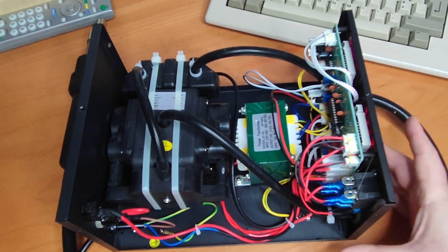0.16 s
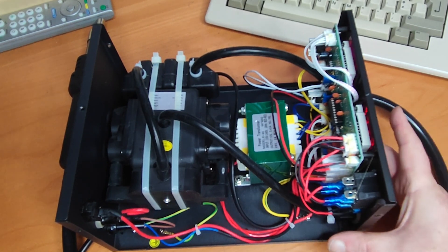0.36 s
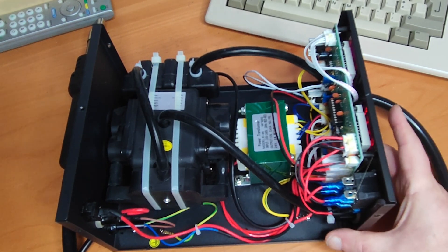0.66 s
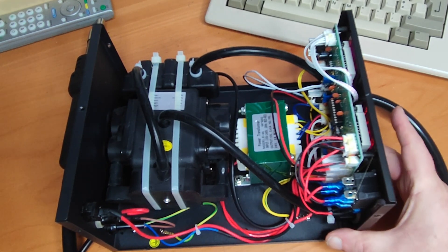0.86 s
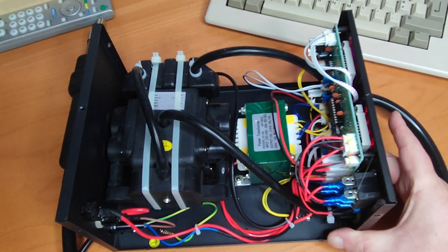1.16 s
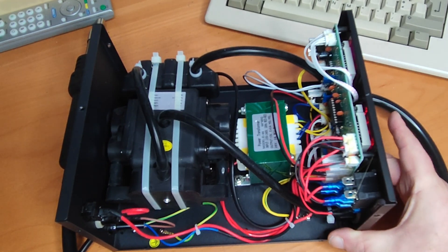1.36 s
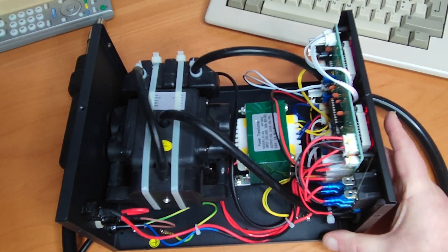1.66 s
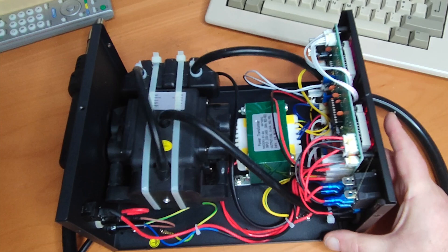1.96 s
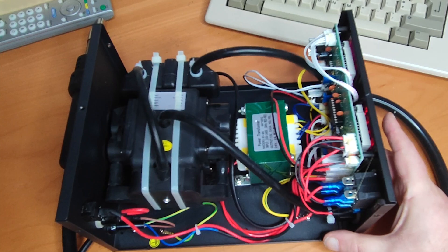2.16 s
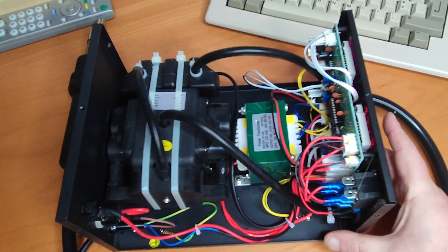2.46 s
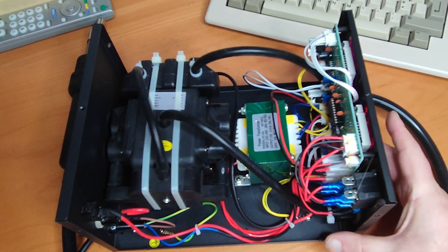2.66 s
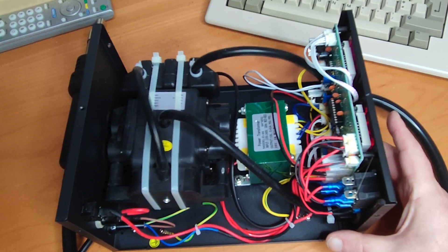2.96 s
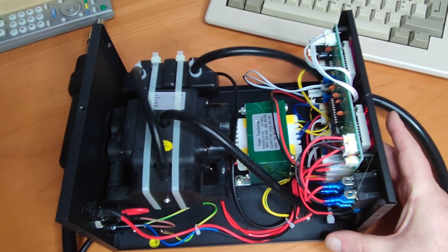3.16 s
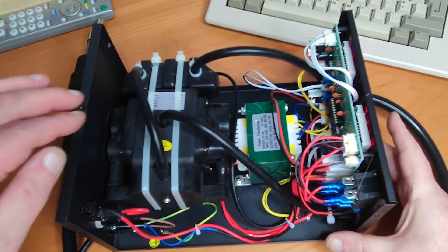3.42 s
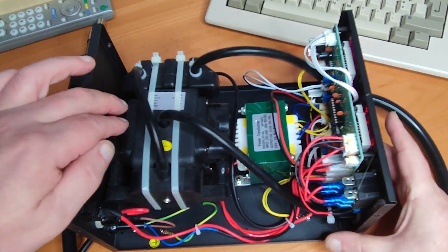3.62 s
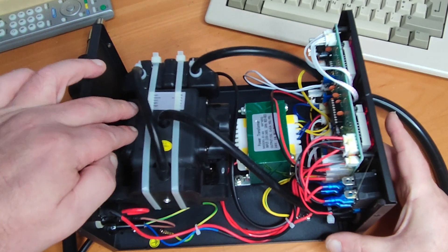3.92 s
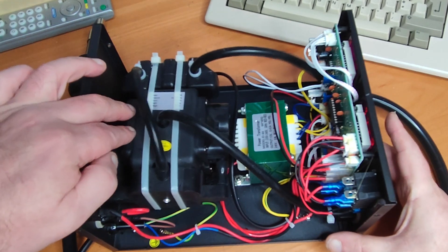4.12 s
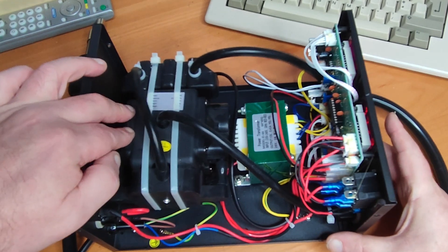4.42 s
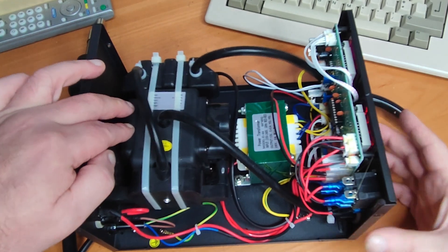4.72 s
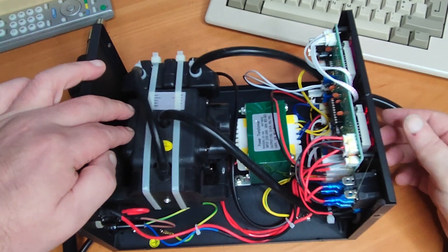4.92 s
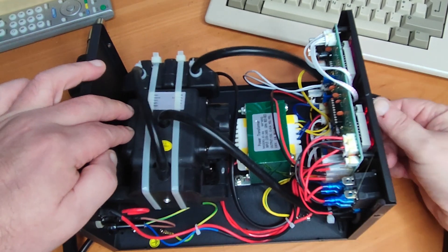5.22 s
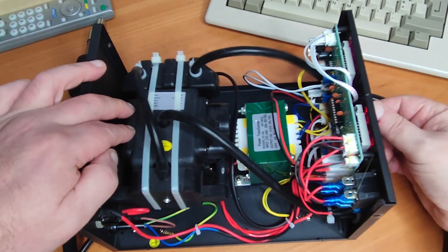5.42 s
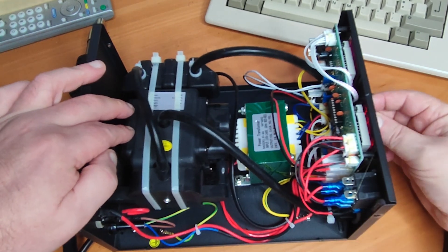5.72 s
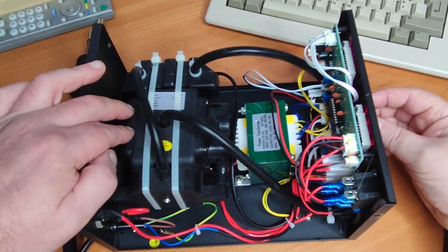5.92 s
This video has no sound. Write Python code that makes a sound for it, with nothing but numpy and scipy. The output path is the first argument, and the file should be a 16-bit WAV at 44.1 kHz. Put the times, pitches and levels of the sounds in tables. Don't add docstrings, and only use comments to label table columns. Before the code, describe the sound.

A switch snaps, a relay clicks, and a buzzing diaphragm pump roars close by, then drops to a quieter hum with whistling leaks.

```python
import sys
import numpy as np
from scipy import signal
from scipy.fft import irfft
from scipy.io import wavfile
from scipy.ndimage import uniform_filter1d

SR = 44100
rng = np.random.default_rng(int(sys.argv[2]) if len(sys.argv) > 2 else 0)


def generate_wav(sig):
    pcm = np.round(np.clip(np.atleast_2d(sig).T, -1, 1) * 32767).astype(np.int16)
    wavfile.write(sys.argv[1], SR, pcm)


def voltage_ratio(decibels):
    exponent = np.asarray(decibels, float) / 20
    return 10 ** exponent


N = 268304
T = np.arange(N) / SR
MAINS_HZ = 50.02


def evened(x):
    return x / np.sqrt(np.mean(x ** 2) + 1e-20)


def read(points, hz):
    f, value = np.transpose(points)
    return np.interp(np.log(hz + 1), np.log(f + 1), value)


def unit(spectrum, hz):
    inside = (hz >= spectrum[0][0]) * (hz <= spectrum[-1][0])
    return evened(voltage_ratio(read(spectrum, hz)) * inside)


def lift(modes, hz):
    return sum((db / (1 + (2 * (hz - f) / width) ** 2) for f, width, db in modes), 0 * hz)


def bump(t, s, length):
    return np.exp(-(2 * (t - s) / length) ** 2)


def drift(size):
    once = uniform_filter1d(rng.standard_normal(N), size=size)
    return evened(uniform_filter1d(once, size=size))


def add(mix, s, sound):
    part = mix[round(s * SR):][:len(sound)]
    part += sound[:len(part)]


def resonate(x, hz, width):
    turn = np.exp(2j * np.pi * np.cumsum(hz * np.ones(len(x))) / SR)
    r = np.exp(-np.pi * width / SR)
    return 2 * (turn * signal.lfilter([1 - r], [1, -r], x / turn)).real


def ring(modes):
    out, t = np.zeros(N), np.arange(SR // 2) / SR
    for s, hz, db, rise, t60 in modes:
        swell = np.sin(np.pi / 2 * np.minimum(t / rise, 1))
        decay = voltage_ratio(db - 60 * np.maximum(t - rise, 0) / t60)
        add(out, max(s, 0), swell * decay * np.sin(2 * np.pi * hz * t))
    return out


def banded(x):
    low_pass = signal.firwin(2047, 15750, window=("kaiser", 9), fs=SR)
    return signal.oaconvolve(x, low_pass, "same")


# time in seconds, grip from 0 to 1.
HELD = [
    (0, 0),
    (2.9, 0),
    (3.3, .5),
    (4.1, .7),
    (4.6, 1),
    (6.1, 1),
]


def noise(spectrum, patchy_db, modes=(), held=None, held_modes=None, lead=0):
    hz, frames = np.fft.rfftfreq(1024, 1 / SR), N // 256 + 5
    a, b, patches = rng.standard_normal((frames, 513, 3)).T
    patches = uniform_filter1d(patches, size=6, axis=0)
    patches = uniform_filter1d(patches, size=30, axis=1)
    patches = evened(np.tanh(evened(patches)))
    grip = np.interp(np.arange(frames) * 256 / SR + lead, *np.transpose(HELD))
    colour = (1 - grip) * unit(spectrum, hz)[:, None] + grip * unit(held or spectrum, hz)[:, None]
    lift_db = (1 - grip) * lift(modes, hz)[:, None] + grip * lift(held_modes or modes, hz)[:, None]
    patch_db = patchy_db * patches * (.45 + .55 * grip)
    z = (a + 1j * b) * colour * voltage_ratio(lift_db + patch_db)
    return evened(signal.istft(z, nperseg=1024, noverlap=768)[1][:N])


# pitch in Hz, level in dB per Hz.
FLOOR = [(18, -51), (30, -6), (62, -17), (95, -9), (221, -7.5), (251, -3.5), (448, -8.5), (910, -15),
         (984, -14.5), (2670, -20), (4750, -21.5), (5140, -21.5), (15900, -23)]
# pitch in Hz, width in Hz, lift in dB.
DESK = [(112, 49, 12.5)]


def room_rumble():
    return voltage_ratio(-63.5) * noise(FLOOR, 3.0, DESK)


# pitch in Hz, level in dB per Hz.
FADING = [(88, -23), (150, 0), (244, -12), (788, -10.5), (1390, -44), (1750, -23), (2350, -21), (3090, -28),
          (4140, -20.5), (7010, -39), (14400, -9.5), (15900, -18)]


def fading_puff():
    t60 = 0.25
    return voltage_ratio(-41.5 - 60 * T / t60) * noise(FADING, 3.4)


# start in seconds, desk top in dB, case in dB, rise in s, 60 dB decay in s.
PUSHES = [
    (0, -40, -46.5, 0.0031, 0.087),
    (.085, -75, -65, .025, 0.16),
    (.221, -70, -48, 0.0047, 0.15),
    (0.238, -56, -61, 0.023, 0.25),
    (1.15, -56, -75, 0.023, 0.39),
    (1.298, -30.5, -60, 0.035, 0.26),
]
# pitch in Hz, level in dB.
DESK_MODES = [(113, 2.5), (195, -7)]
CASE_MODES = [(255, 2), (320, 2.5), (385, -8), (490, -10), (590, -14), (765, -13)]
# start in seconds, pitch in Hz, level in dB, rise in s, 60 dB decay in s.
FIRST_KNOCK = [
    (0, 780, -50, .002, 0.11),
    (0, 593, -50, .002, 0.17),
]
# start in seconds, pitch in Hz, level in dB, rise in s, 60 dB decay in s.
JOLT = (1.5825, 108, -20.5, .052, .16)


def knocks():
    rings = []
    for s, desk_db, case_db, rise, t60 in PUSHES:
        for db, modes in ((desk_db, DESK_MODES), (case_db, CASE_MODES)):
            for hz, mode_db in modes:
                shorter = min(300 / hz, 1) ** .5
                rings.append((s, hz, db + mode_db, rise, t60 * shorter))
    return ring(rings + FIRST_KNOCK + [JOLT])


# time in seconds, pitch in Hz, level in dB.
CREAK = [
    (.221, 290, -62),
    (.226, 285, -50),
    (.25, 336, -47.5),
    (.283, 255, -52),
    (.295, 240, -59),
    (.33, 235, -72),
]


def creak():
    s, hz, db = np.transpose(CREAK)
    turn = 2 * np.pi * np.cumsum(np.interp(T, s, hz)) / SR
    on = (T > s[0]) * (T < s[-1])
    judder = 1 + 0.27 * np.cos(2 * np.pi * 70 * T)
    return on * voltage_ratio(np.interp(T, s, db)) * np.sqrt(2) * np.sin(turn) * judder


# pitch in Hz, 60 dB decay in seconds.
ROOM = [(400, 0.53), (1100, 0.27), (2800, 0.42), (3600, 0.27), (4500, 0.23), (8500, 0.24), (11000, 0.17),
        (15000, 0.17)]


def room_tail():
    hz, t, z = signal.stft(rng.standard_normal(SR // 2), SR, nperseg=256)
    tail = signal.istft(z * voltage_ratio(-60 * t / read(ROOM, hz)[:, None]), SR, nperseg=256)[1]
    return tail / np.linalg.norm(tail)


def snaps(events, spectrum, rings):
    crack, direct, send = noise(spectrum, 0.67, rings), np.zeros(N), np.zeros(N)
    t = np.arange(SR // 5) / SR
    for s, db, rise, t60, room_db in events:
        shape = np.minimum(t / rise, 1) ** 2 * voltage_ratio(db - 60 * np.maximum(t - rise, 0) / t60)
        burst = shape * crack[round(s * SR):][:len(t)]
        add(direct, s, burst)
        add(send, s + rise, np.array([voltage_ratio(room_db) * np.linalg.norm(burst)]))
    hz = np.fft.rfftfreq(512, 1 / SR)
    colour = np.fft.fftshift(irfft(unit(spectrum, hz) * voltage_ratio(lift(rings, hz))))
    send = signal.oaconvolve(send, colour / np.linalg.norm(colour), "same")
    return direct + voltage_ratio(8.5) * banded(signal.oaconvolve(send, room_tail())[:N])


# start in seconds, level in dB, rise in s, 60 dB decay in s, room in dB.
SWITCH = [
    (1.2902, -11.5, .0045, 0.022, -6.5),
    (1.3065, -26.5, .003, 0.046, -14.5),
]
# pitch in Hz, level in dB per Hz.
SNAP = [(180, -64), (300, -34), (488, -32), (680, -44), (850, -27), (1150, -18.5), (1850, -24.5),
        (2840, -25), (3500, -13.5), (4460, -7.5), (5280, -12), (11000, -5), (14400, -5), (15700, -12),
        (15900, -26), (16500, -32.5)]
# pitch in Hz, width in Hz, lift in dB.
SWITCH_RINGS = [(1070, 430, 8), (1470, 130, 9), (2240, 200, 9), (4520, 250, 8), (5700, 900, 4),
                (8100, 480, 5.5), (14750, 500, 3)]
# start in seconds, pitch in Hz, level in dB, rise in s, 60 dB decay in s.
ROCKER = [(1.2925, 4465, -25.5, .002, .19), (1.293, 4576, -34, .002, .27), (1.293, 4400, -32, .002, .12),
          (1.294, 6080, -29, .002, .12), (1.294, 5615, -33, .002, .18), (1.296, 3908, -37, .003, .18),
          (1.30, 3585, -41, .006, .25), (1.296, 1308, -42, .004, .19), (1.294, 6928, -36, .002, .17),
          (1.294, 7790, -35, .002, .2), (1.294, 1120, -33, .006, .12), (1.295, 880, -41, .006, .12),
          (1.297, 2130, -40, .008, .15), (1.297, 2240, -39, .006, .12), (1.296, 1580, -35, .003, .1),
          (1.298, 480, -47, .02, .13), (1.315, 420, -52, .02, .15), (1.37, 55, -50, .02, .25)]


def switch():
    gate = np.clip((1.47 - T) / 0.058, 0, 1)
    return gate * (snaps(SWITCH, SNAP, SWITCH_RINGS) + ring(ROCKER))


# start in seconds, level in dB, rise in s, 60 dB decay in s, room in dB.
RELAY = [
    (1.5605, -15.5, .0045, 0.016, -20),
    (1.5668, -19, .0015, 0.022, -3.5),
    (1.5725, -35, .001, .04, -14),
]
# pitch in Hz, level in dB per Hz.
RELAY_SNAP = [(290, -58), (500, -26), (2540, -36), (4110, -18), (4690, -31), (5590, -9.5), (6760, -18),
              (13600, 0.5), (16500, -21)]
# pitch in Hz, width in Hz, lift in dB.
RELAY_RINGS = [(4120, 270, 11), (5650, 200, 17), (9500, 350, 16.5), (11500, 400, 8), (13600, 450, 4)]


def relay():
    return snaps(RELAY, RELAY_SNAP, RELAY_RINGS)


# start in seconds, pitch in Hz, level in dB, rise in s, 60 dB decay in s.
ARMATURE = [
    (1.5635, 9550, -22, .0015, .025),
    (1.563, 5680, -24, .002, .035),
    (1.5665, 13800, -21, .0015, .025),
    (1.564, 15300, -26, .0015, .02),
    (1.565, 900, -46, .003, .08),
    (1.567, 700, -49, .006, .15),
]


def armature():
    return ring(ARMATURE)


def stroke(depth_db, uneven=0.22):
    turn = 2 * np.pi * MAINS_HZ * T
    return voltage_ratio(depth_db * (np.cos(2 * turn - 1.9) + uneven * np.cos(turn - .3)))


def whistles(breeze, rows, glide, width_share):
    out = np.zeros(N)
    for s, length, middle_hz, db in rows:
        first, count = round((s - length / 2) * SR), round(length * SR)
        wind = breeze[first:first + count]
        hz = middle_hz * (1 + glide * np.linspace(-.5, .5, num=len(wind)))
        width = 1.83 * width_share * np.sqrt(middle_hz * 10000)
        whistle = evened(resonate(resonate(wind, hz, width), hz, width))
        add(out, first / SR, voltage_ratio(db) * whistle * np.hanning(count)[:len(wind)] ** 0.83)
    return out


# middle in seconds, length in s, pitch in Hz, level in dB.
STIRS = [
    (.18, .3, 14900, -66),
    (.375, 0.18, 14850, -63),
    (1.17, .09, 4420, -75),
    (3.7, 0.37, 14750, -48),
]
BROAD = [(3.25, 1.7, 12400, -40.5), (3.52, 0.8, 11330, -50), (3.24, 0.2, 4630, -51),
         (3.1, 0.43, 2730, -54.5), (3.85, 1.5, 14200, -43), (4.673, 0.066, 12650, -45),
         (5.7, .1, 13300, -40), (4.982, 0.19, 13800, -25), (5.58, 0.38, 9000, -47), (5.29, 0.6, 9430, -46),
         (5.3, 0.52, 9130, -48), (5.44, 1.1, 7320, -53), (5.58, .5, 12800, -49)]
PINCHED = [(3.058, 0.087, 1330, -41), (3.09, .12, 4700, -48), (3.38, 0.81, 2425, -55.5),
           (3.13, 0.33, 2800, -56), (3.05, 0.34, 2380, -51), (3.51, 0.2, 3525, -51), (4.2, 0.73, 3520, -54),
           (4.198, 0.14, 1360, -47.5), (4.425, 0.19, 2470, -51.5), (4.9, 0.16, 3520, -54),
           (5.53, 0.24, 2520, -51), (5.37, .16, 2520, -56), (5.17, .15, 2520, -58), (5.82, .2, 2520, -58),
           (4.3, 0.43, 2250, -59), (3.3, .12, 4500, -51), (3.22, .1, 5200, -51), (3.05, .1, 5250, -47),
           (5.65, .25, 1080, -57), (4.1, 0.33, 1150, -56), (4.25, .2, 960, -54), (3.66, .1, 325, -55),
           (3.9, .2, 335, -62), (5.7, .2, 340, -65)]
TWISTED = [
    (4.72, .12, 8360, -43),
    (4.766, .15, 13400, -33),
    (4.9, 0.28, 8950, -50),
    (5.05, .2, 14350, -38),
    (4.798, .065, 5980, -40),
    (4.91, 0.17, 6000, -40),
    (5.08, .3, 6050, -51),
    (5.3, 0.5, 4950, -54),
]
SLITS = [(1.7, .26, 13850, -35), (2.08, 1.0, 13800, -34), (2.0, .85, 14250, -37), (2.75, .7, 14500, -37),
         (2.75, .5, 12750, -38), (2.5, .25, 12250, -41), (2.8, .7, 11550, -42), (2.2, .7, 11550, -42),
         (2.3, .9, 10100, -43), (3.3, .6, 14700, -46), (5.95, .4, 9250, -60), (3.28, .45, 12950, -39.5),
         (3.15, .8, 12700, -43), (3.2, .6, 12250, -48), (3.2, .6, 11450, -46), (3.6, .3, 12200, -52),
         (3.52, .5, 11450, -45), (3.9, .5, 11350, -49), (3.6, .25, 13000, -50), (3.8, .7, 14400, -49),
         (4.1, 1.0, 13500, -43), (4.1, 1.2, 13750, -42), (4.15, .8, 13000, -53), (3.7, .6, 10060, -55),
         (4.98, .24, 13200, -37), (5.0, .2, 15200, -44), (5.5, .25, 12900, -48), (5.72, .2, 12850, -52),
         (5.3, .6, 12200, -52), (5.6, .6, 14400, -52), (5.95, .3, 13700, -53), (3.55, .3, 13650, -48),
         (5.9, .5, 5750, -59), (4.82, .14, 5100, -51), (5.3, .4, 4980, -51), (5.65, .4, 4900, -56),
         (4.93, .16, 3200, -56)]
SWEPT = [
    (5.14, .22, 14750, -37),
    (4.68, .12, 12750, -44),
    (4.97, .16, 6350, -47),
]


def leaks():
    breeze = rng.standard_normal(N) * stroke(depth_db=0.8)
    unsteady = evened(uniform_filter1d(rng.standard_normal(N), size=900))
    breeze *= voltage_ratio(0.71 * unsteady)
    out = whistles(breeze, STIRS, glide=-.015, width_share=.07)
    out += whistles(breeze, BROAD, glide=-.012, width_share=.039)
    out += whistles(breeze, PINCHED, glide=-.005, width_share=.014)
    out += whistles(breeze, TWISTED, glide=.045, width_share=.039)
    out += whistles(breeze, SLITS, glide=-.012, width_share=.02)
    return out + whistles(breeze, SWEPT, glide=.07, width_share=.022)


# time in seconds, drive in dB,
# air flow in dB (0 is free, lower is throttled by the hands).
PUMP = [(1.6, -39.5, -0.5), (1.81, -38.5, 0), (2.59, -38, -1), (2.82, -40, -1), (3.17, -51.5, -3),
        (3.3, -54.5, -3), (3.53, -54.5, -2), (3.69, -54, -3), (4.14, -54, -3), (4.48, -54, -2),
        (5.31, -52.5, -6), (5.67, -52.5, -6.5), (6.08, -54, -11)]


def level(offset_db, flow_share, start):
    s, drive_db, flow_db = np.transpose(PUMP)
    gain = voltage_ratio(np.interp(T, s, drive_db + offset_db + flow_share * flow_db))
    return gain * np.clip((T - start) / .02, 0, 1)


def reed():
    hz, width = 4600, 220 * 1.4
    puffs = rng.standard_normal(N) * stroke(depth_db=7.5, uneven=.3) * voltage_ratio(1.0 * drift(size=900))
    chatter = resonate(resonate(puffs, hz, width), hz, width)
    return voltage_ratio(4.0) * evened(chatter) * level(-3.0, 0.67, start=1.575)


# pitch in Hz, width in Hz, lift in dB.
CAVITIES = [(1295, 90, 11.5), (2040, 140, 4), (2710, 150, 7), (3410, 110, 4), (3998, 115, 10),
            (5220, 100, 8.5), (5930, 90, 5), (8900, 300, 1.5), (10200, 250, 4.5), (11550, 180, 5)]
CAVITIES_HELD = [(1310, 140, 6.6), (2060, 130, 3), (3470, 100, 4.3), (4030, 120, 3), (5250, 100, 2.8),
                 (5780, 170, 5.1), (10740, 200, 3), (12100, 180, 3.6), (14400, 280, 1)]
# pitch in Hz, level in dB per Hz.
JET = [(4000, -16.5), (6800, -22), (7380, -11.5), (9040, -3.5), (10300, -7), (10800, -7), (12200, -4.5),
       (13900, 1.5), (14800, 0), (15900, -14)]
JET_HELD = [(4000, -43), (6800, -24.5), (8100, -12.5), (9060, -19), (9820, -12), (12300, -10.5),
            (13300, -6.5), (13800, -5), (14600, -4), (15700, -11)]


def jet():
    hiss = noise(JET, 1.3, CAVITIES, JET_HELD, CAVITIES_HELD, lead=.4)
    return voltage_ratio(10.0) * hiss * stroke(depth_db=0.7) * level(4.28, 0.85, start=1.563)


# pitch in Hz, level in dB per Hz.
RUSH = [(1650, -12), (2800, -10), (3400, -3), (3750, -9.5), (3980, -4), (4570, -2), (4910, -2), (7200, -7),
        (9360, -40), (15800, -120)]
RUSH_HELD = [(1650, -12), (2800, -15.5), (3200, -8), (3470, -4), (3770, -8), (4530, -3), (4930, -6),
             (7200, -9), (9360, -49), (15800, -120)]


def rush():
    hiss = noise(RUSH, 2.6, CAVITIES, RUSH_HELD, CAVITIES_HELD)
    return voltage_ratio(-0.2) * hiss * stroke(depth_db=1.5) * level(7.73, 0.76, start=1.563)


# pitch in Hz, level in dB per Hz.
FLUTTER = [(62, -34), (85, -14), (120, -8), (240, -21), (340, -12.5), (470, -17), (700, -8.5), (900, -9.5),
           (1100, -2.5), (1400, -6.5), (1480, -9.5), (1850, -12), (2300, -17), (3200, -15), (4200, -47)]
FLUTTER_HELD = [(62, -40), (85, -17), (100, -17), (250, -19), (500, -12.5), (760, -11), (1050, -4),
                (1400, -8.5), (1480, -7.5), (1850, -18), (2300, -10), (3200, -14.5), (4200, -53)]


def flutter():
    rumble = noise(FLUTTER, 2.1, CAVITIES, FLUTTER_HELD, CAVITIES_HELD)
    surge = voltage_ratio(4 * bump(T, s=1.662, length=0.17))
    return voltage_ratio(-1.4) * rumble * stroke(depth_db=-1.0) * level(6.54, 1, start=1.577) * surge


# middle in seconds, length in s, multiple of mains, level in dB.
PANELS = [
    (4.24, 0.17, 14, -55),
    (4.42, 0.16, 14, -56),
    (4.32, 0.57, 14, -50),
    (4.24, 0.17, 19, -51.5),
    (5.85, 0.82, 21, -65),
    (5.85, 0.48, 45, -68),
]


def panels():
    out = np.zeros(N)
    for s, length, k, db in PANELS:
        t = np.arange(0, length, 1 / SR)
        tone = np.sin(2 * np.pi * k * MAINS_HZ * (t + s - length / 2)) * np.sqrt(2)
        add(out, s - length / 2, voltage_ratio(db) * tone * signal.windows.tukey(len(t), .7))
    return out * voltage_ratio(2.0 * drift(size=700))


# middle in seconds, length in s, multiple of mains,
# change in dB.
FALTERS = [(1.58, .1, 7, -10), (1.58, .1, 8, -8), (1.62, .13, 2, -14), (1.64, .14, 4, 6), (3.9, .7, 6, 3),
           (3.0, .7, 4, -3), (2.43, .05, 2, -4), (3.1, .7, 46, 6), (3.75, .4, 30, 7), (3.8, .5, 7, 4),
           (4.0, 1.6, 36, 7), (5.585, .07, 2, -16), (5.72, .2, 2, -6)]
# multiple of mains, change in dB.
LATE_SHIFT = [(3, -9), (4, 3), (8, -6), (12, 3), (15, -7)]
# multiple of mains, change in dB.
SQUEEZE = [(31, -11), (68, -6), (80, -9), (84, -6), (86, -6), (88, -6)]


def order_change_db(k, t):
    brief = sum((db * bump(t, s, length) for s, length, order, db in FALTERS if order == k), 0 * t)
    late_shift = dict(LATE_SHIFT).get(k, 0) * bump(t, s=5.95, length=.75)
    squeeze = dict(SQUEEZE).get(k, 0) * bump(t, s=5.5, length=2.6)
    return brief + late_shift + squeeze


KNOTS = np.linspace(0, T[-1], num=90)
SLAP_WOBBLE_DB = 4.0


def order_tone(k):
    return np.sin(2 * np.pi * (k * (MAINS_HZ * T % 1) + rng.random()))


# multiple of mains, level in dB.
BUZZ = [(31, -3), (34, -8), (36, -9), (40, -6), (42, -12), (46, -8), (68, -11), (80, -2), (84, -7),
        (86, -7), (88, -4), (92, -8), (105, -6.5), (120, -14), (41, -9)]


def buzz():
    out, grip = np.zeros(N), np.interp(KNOTS, *np.transpose(HELD))
    for k, db in BUZZ:
        wobble = SLAP_WOBBLE_DB * rng.standard_normal(len(KNOTS))
        height = voltage_ratio(db + wobble + order_change_db(k, KNOTS) - 6.8 * grip)
        out += np.interp(T, KNOTS, height) * order_tone(k)
    return out


# pitch in Hz, level in dB.
SLAP = [(1500, -22), (2000, -16.5), (2600, -12.5), (3400, -20.5), (4000, -20), (4600, -38), (5500, -14.5),
        (7000, -26)]


def slaps():
    out, grip = np.zeros(N), np.interp(KNOTS, *np.transpose(HELD))
    high = np.arange(31, 140)
    slap = voltage_ratio(read(SLAP, high * MAINS_HZ) + 2.5 * rng.standard_normal(len(high)))
    slap[[k - high[0] for k, db in BUZZ]] = 0
    cycle = np.linspace(0, 1, num=4097)
    phase = rng.random((len(high), 1))
    waves = slap[:, None] * np.sin(2 * np.pi * (high[:, None] * cycle + phase))
    for group in range(8):
        breath = voltage_ratio(SLAP_WOBBLE_DB * rng.standard_normal(len(KNOTS)) - 2.4 * grip)
        wave = np.interp(MAINS_HZ * T % 1, cycle, waves[group::8].sum(0))
        out += np.interp(T, KNOTS, breath) * wave
    return out


# multiple of mains, level in dB.
HUM = [(1, -33), (2, 0), (3, -9), (4, -13), (5, -33), (6, -11), (7, -15), (8, -4), (9, -30), (10, -4),
       (11, -19), (12, -7), (13, -5), (14, -6), (15, 0), (16, -9), (17, -4), (18, -9), (19, -6), (20, -9),
       (21, -5), (22, -2), (23, -8), (24, -11), (25, -8), (26, -6), (27, -3), (28, -2.5), (29, -19),
       (30, -13)]
HUM_HELD = [(1, -31), (2, 0), (3, -12), (4, -9), (5, -33), (6, -11), (7, -16), (8, -3), (9, -31), (10, -6),
            (11, -25), (12, -7), (13, -11), (14, -14), (15, -3.5), (16, -15), (17, -11), (18, -9),
            (19, -11), (20, -13), (21, -9), (22, -11), (23, -11), (24, -10), (25, -10), (26, -11),
            (27, -11), (28, -12), (29, -17), (30, -16)]
# pitch in Hz, level in dB.
SWING = [(50, 8), (100, 3.5), (200, 2.5), (900, 3), (1500, 1.5)]


def hum():
    fine = np.linspace(0, T[-1], num=600)
    grip = np.interp(KNOTS, *np.transpose(HELD))
    out = slaps() + buzz()
    for (k, db), (_, held_db) in zip(HUM, HUM_HELD):
        wobble = 1.8 * min(k / 6, 1) * rng.standard_normal(len(KNOTS))
        blend = (1 - grip) * db + grip * held_db
        height = voltage_ratio(blend + read(SWING, k * MAINS_HZ) + wobble)
        height = np.interp(fine, KNOTS, height) * voltage_ratio(order_change_db(k, fine))
        out += np.interp(T, fine, height) * order_tone(k)
    return voltage_ratio(6.5) * evened(out) * level(0.11, 0.01, start=1.577)


def scene():
    background = room_rumble() + fading_puff() + knocks() + armature() + creak()
    air = leaks() + reed() + jet() + rush() + flutter()
    lasting = background + air + panels() + hum()
    mono = banded(lasting) + switch() + relay()
    return np.array([mono, mono])


def top_cut(x):
    return signal.sosfilt(signal.butter(12, 16820, fs=SR, output="sos"), x)


def record(dry):
    thin = signal.sosfilt(signal.butter(2, 80, "high", fs=SR, output="sos"), dry)
    return top_cut(thin)


dry = scene()
out = record(dry)
generate_wav(out)
```